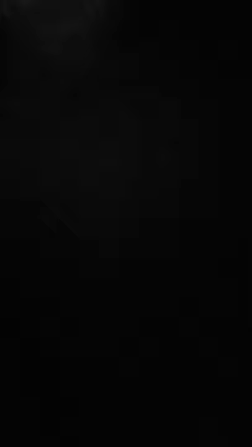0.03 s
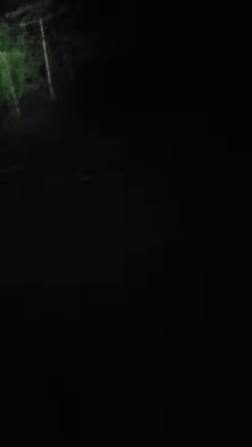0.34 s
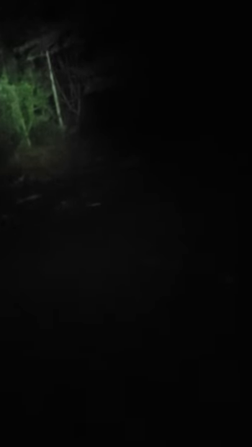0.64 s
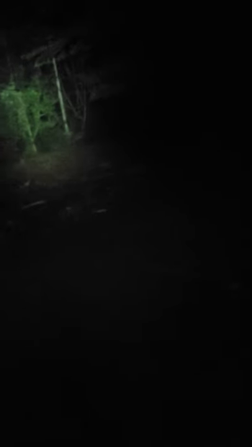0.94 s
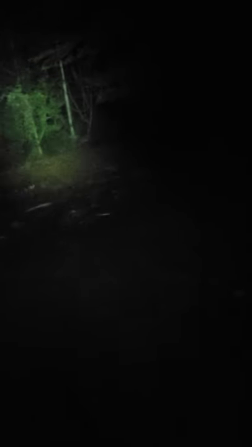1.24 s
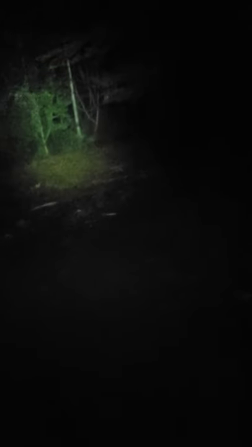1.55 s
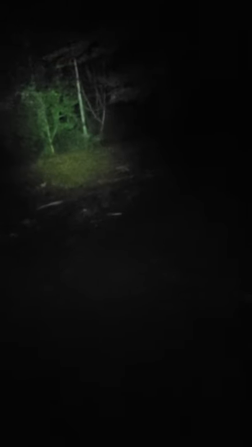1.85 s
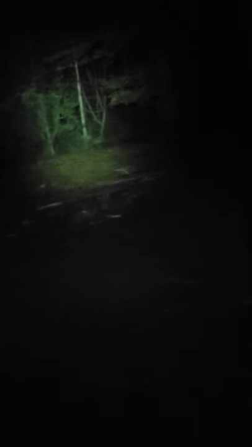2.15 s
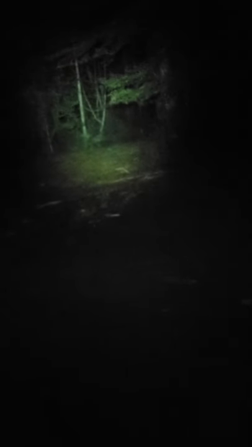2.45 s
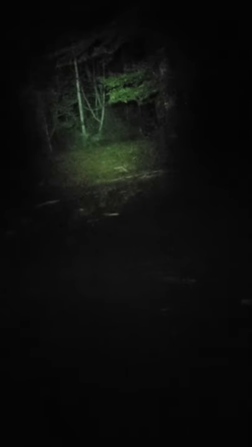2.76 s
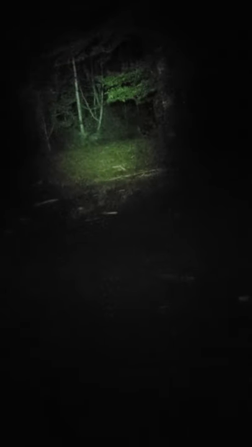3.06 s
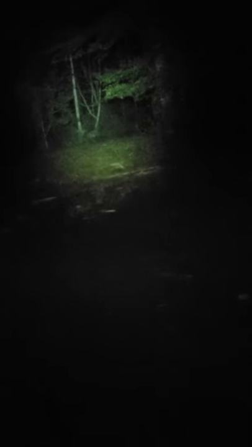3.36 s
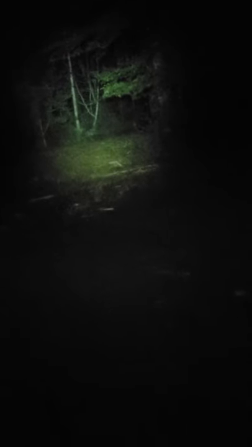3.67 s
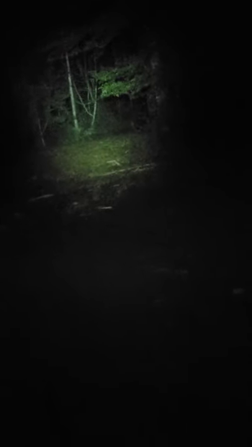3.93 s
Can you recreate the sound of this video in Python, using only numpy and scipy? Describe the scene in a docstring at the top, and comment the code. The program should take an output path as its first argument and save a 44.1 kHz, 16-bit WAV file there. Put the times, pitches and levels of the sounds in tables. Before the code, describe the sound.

Two hoarse, falling fox barks echo from a distance through night woods, about a second and a half apart. Katydids scrape steadily over faint frogs, a cricket joins near the end, and the hand-held microphone adds light bumps.

```python
"""A fox in the night woods

A distant fox pushes voice and breath through its throat in two harsh barks that ring among the trees.
Katydids scrape their wings all round, over hissing small insects and far frogs; late on, a tree
cricket chirps. Under it lies a faint drone; the hand-held microphone adds rumble, rustle and bumps."""
import sys
import numpy as np
from scipy import signal
from scipy.fft import rfft, irfft, next_fast_len
from scipy.io import wavfile
from scipy.ndimage import map_coordinates

SR = 44100
rng = np.random.default_rng(int(sys.argv[2]) if len(sys.argv) > 2 else 0)


def wav_out(sig):
    """Save sig, one row per channel (or a flat mono array), as 16-bit PCM at SR to the path in sys.argv[1]."""
    wavfile.write(sys.argv[1], SR, np.round(np.clip(np.atleast_2d(sig).T, -1, 1) * 32767).astype(np.int16))


N = 176400
TIME = np.arange(N) / SR

# How each bark moves, one list per bark (time [s], mouth resonance [Hz], effort [dB])
BARK_SHAPES = [
    [(.095, 1330, -17), (.148, 1230, -4), (.22, 1080, 0), (.31, 980, -3.5), (.365, 845, -7.5)],
    [(1.53, 1650, -15), (1.575, 1340, -3), (1.628, 1193, 0), (1.685, 980, 0.5), (1.745, 908.6, -2.5),
     (1.795, 822, -7)],
]
# How strongly the throat passes each frequency (frequency [Hz], relative level [dB])
THROAT_TONE = [(120, -32.5), (260, -15), (470, -25), (590, -24.5), (720, -11.5), (830, -2), (1000, -3.5),
               (1350, -6.5), (1680, 1.5), (1950, -11.5), (2500, -7.5), (3200, -14), (5000, -31),
               (9000, -50), (15000, -82)]
def fox():
    """Voice and pulsing breath ring the throat; pitch and mouth resonance sink as the jaw closes."""
    top_pitch_hz, jitter, release_s = 1147.5, 0.03002, .021
    mouth_width_hz, mouth_db, thin_db = 200, 6, 8
    barks = np.zeros(N)
    for shape in BARK_SHAPES:
        times, mouths, efforts = np.transpose(shape)
        pitch = np.minimum(np.interp(TIME, times, mouths), top_pitch_hz)
        phase = phase_of(pitch * (1 + jitter * wobble(260)))
        voice = unit(sum(np.sin(k * phase) / k for k in range(1, 5)) * amp(1.7 * wobble(180)))
        breath = rng.standard_normal(N) * (1 + 0.74 * np.cos(phase)) * amp(1.13 * wobble(120))
        voice, breath = (unit(resonate(part[None], THROAT_TONE)[0]) for part in (voice, breath))
        breath_share = np.interp(TIME, times[[1, -1]], [.97, .86])  # mostly breath, so it is harsh
        harsh = np.sqrt(1 - breath_share) * voice + np.sqrt(breath_share) * breath
        # Cut the sound into short slices to change its tone over time.
        hz, t, slices = signal.stft(harsh, SR, nperseg=512)
        hz = hz[:, None]
        mouth_hz, effort_db = np.interp(t, times, mouths), np.interp(t, times, efforts)
        mouth = amp(mouth_db / (1 + ((hz - mouth_hz) / mouth_width_hz) ** 2) - mouth_db / 2)
        # More effort gives more treble; the cry starts thin and fills out below.
        bright = amp(1.7 * effort_db * np.clip(np.log2((hz + 1) / 1600), 0, 1))
        thin = amp(-thin_db * np.clip((mouth_hz - np.maximum(hz, 800)) / 500, 0, 1))
        cry = signal.istft(slices * mouth * bright * thin, SR, nperseg=512)[1][:N]
        outside_s = np.maximum(times[0] - TIME, 0) + np.maximum(TIME - times[-1], 0)
        barks += cry * amp(np.interp(TIME, times, efforts) - 42.5) * np.exp(-outside_s / release_s)
    return pan(db=4.5) * among_trees(barks, trunks_db=0, woods_db=-6.5)


# Wing strokes of the nearby katydids (start [s], length [s], relative level [dB])
WING_STROKES = [(0.109, 0.028, -51.5), (0.158, 0.067, -39.0), (0.305, 0.015, -43), (0.346, 0.02, -35),
                (0.477, 0.035, -35), (0.521, 0.063, -37.5), (0.603, 0.053, -36), (0.683, 0.039, -37.5),
                (0.782, 0.064, -36.5), (0.86, 0.04, -40.5), (0.926, 0.035, -38.5), (0.965, 0.026, -33),
                (1.031, 0.058, -41.5), (1.091, 0.051, -35.5), (1.147, 0.048, -40), (1.2, 0.06, -38),
                (1.292, 0.041, -35.5), (1.357, 0.046, -42), (1.471, 0.1, -39.5), (1.621, 0.056, -41.5),
                (1.656, 0.026, -35.5), (1.754, 0.097, -36), (1.91, 0.042, -42.5), (2.005, 0.025, -37.5),
                (2.071, 0.022, -42), (2.163, 0.034, -36.5), (2.262, 0.022, -44), (2.319, 0.04, -35.5),
                (2.389, 0.024, -37.5), (2.43, 0.041, -36), (2.502, 0.026, -39), (2.564, 0.032, -39.5),
                (2.626, 0.072, -35.5), (2.719, 0.029, -45.5), (2.811, 0.053, -35), (2.878, 0.025, -38),
                (2.968, 0.06, -36), (3.132, 0.06, -36), (3.218, 0.096, -42.5), (3.288, 0.065, -37),
                (3.383, 0.0506, -40), (3.574, 0.034, -43.5), (3.758, 0.042, -38.5), (3.83, 0.048, -48.5),
                (3.933, 0.056, -39)]
# How a katydid's wing rings (frequency [Hz], relative level [dB])
WING_TONE = [(2000, -43.5), (2600, -27.5), (2880, -7), (3100, 0), (3300, -1.5), (3560, 4), (3850, -2.5),
             (4100, -10.5), (4450, -26.5), (7000, -34), (9000, -48), (13000, -55)]
def near_katydids():
    """Tiny teeth strike and ring the wings, making rasps; most of the insects sit to the left."""
    sides_db = 5 + 2 * rng.standard_normal(len(WING_STROKES))
    strikes = np.zeros((2, N))
    for (start, length, db), side_db in zip(WING_STROKES, sides_db):
        strikes += amp(db - 4.5) * pan(side_db) * wing_peak(wing_stroke(start, length))
    return among_trees(resonate(strikes, WING_TONE), trunks_db=-11, woods_db=-20)


def wing_stroke(start, length):
    """A quick, uneven run of tooth strikes, each reaching left and right by its own path."""
    tooth_hz, edge_s, path_spread_s, force_spread_db = 370, .003, .0002, .9
    draws = rng.standard_normal((6, 90))
    speed, gaps, paths, forces = draws[0, 0], draws[1], draws[2:4], draws[4:]
    rate = tooth_hz * np.exp(.15 * speed)
    t = np.cumsum(np.abs(1 + .14 * gaps)) / rate - edge_s
    swell = np.clip(np.minimum(t + edge_s, length + edge_s - t) / (2 * edge_s), 0, 1)
    strikes = np.zeros((2, N))
    for side in range(2):
        arrival_s = start + t + path_spread_s * paths[side]
        at = np.clip((arrival_s * SR).astype(int), 0, N - 1)
        strikes[side] = np.bincount(at, swell * amp(force_spread_db * forces[side]) * (at < N - 1), N)
    return strikes * np.sqrt(SR / rate)


def wing_peak(strikes):
    """Every insect's wing rings at a slightly different pitch."""
    hz = 3610 * np.exp(.03 * rng.standard_normal())
    return strikes + .7 * signal.lfilter(*signal.iirpeak(hz, Q=16, fs=SR), strikes + 1e-20)


# The tree cricket's chirps (loudest moment [s], pitch [Hz], relative level [dB])
CRICKET_CHIRPS = [(2.934, 2085, -44.5), (2.94, 2255, -49.5), (2.984, 2085, -51), (3.062, 2175, -45.5),
                  (3.171, 2212, -39.5), (3.289, 2206, -40.5), (3.404, 2203, -41), (3.521, 2210, -43),
                  (3.65, 2210, -43.5), (3.771, 2202, -42.5), (3.883, 2203, -44), (3.999, 2210, -41)]
def tree_cricket():
    """Nearly pure chirps swell and stop short; echoes fill the gaps."""
    fall_s, waver_hz = .011, 13
    song = np.zeros(N)
    for crest, hz, db in CRICKET_CHIRPS:
        t = TIME - crest
        rise_s = .015 if crest < CRICKET_CHIRPS[0][0] + .05 else .028  # the opening is more abrupt
        swell = np.exp(-(t / np.where(t < 0, rise_s, fall_s)) ** 2)
        song += amp(db - .8) * swell * np.sin(phase_of(hz + waver_hz * wobble(170)))
    return pan(db=-0.5) * among_trees(song, trunks_db=-9, woods_db=-2.5)


# How loud the far katydids and crickets are (time [s], level [dB])
CHORUS_LOUDNESS = [(.07, -45), (.45, -47.5), (1.1, -42), (2.6, -45.5), (3.35, -44.5), (3.5, -49.5),
                   (4, -53.5)]
def far_katydids():
    """Countless rasps merge into a fluttering hiss; at its centre, far crickets add a wavering trill."""
    trill_hz, waver_hz, flutter_db = 3630, 60, 2.8
    flutter = amp(flutter_db * wobble(35)) * (1 + 0.053 * np.tanh([wobble(380), wobble(300)]))
    phase = phase_of(trill_hz + waver_hz * np.array([wobble(140), wobble(140)]))
    trill = unit(np.sin(phase) * np.abs([wobble(60), wobble(60)]))
    rasps = unit(flutter * noise(WING_TONE, alike=0.042))
    return level(CHORUS_LOUDNESS) * pan(db=2.5) * (rasps + amp(-5) * trill)


# The tone of the insect hiss (frequency [Hz], relative level [dB])
HISS_TONE = [(3800, -22), (4500, -11), (5250, -4.5), (5620, 4), (5850, -0.5), (6280, -0.5), (6650, -10.5),
             (7500, -30.5), (9600, -38), (10500, -31), (11100, -24.5), (12000, -38), (15700, -33.5)]
# How far left the hiss leans (frequency [Hz], left minus right [dB])
HISS_LEAN = [(4200, 2.5), (5500, 11.5), (6300, 22.5), (7800, 40.5), (9500, 23), (11100, 9.5), (13000, 3)]
# How loud the hiss is (time [s], level [dB])
HISS_LOUDNESS = [(0, -55.5), (1.3, -53.5), (3.1, -53), (4, -55)]
def small_insects():
    """Small insects blend into a high, finely pulsing hiss, mostly from the left."""
    def lean_left(hz):
        gains = pan(value_at(HISS_LEAN, hz))
        return gains / np.linalg.norm(gains, axis=0)

    pulsing = 1 + .13 * np.sin(2 * np.pi * 57 * TIME) + .12 * np.sin(2 * np.pi * 78 * TIME)
    loudness = level(HISS_LOUDNESS) * amp(0.8 * wobble(24))
    return loudness * unit(filtered(noise(HISS_TONE, alike=0), lean_left) * pulsing)


# The tone of the frog chorus (frequency [Hz], relative level [dB])
FROG_TONE = [(500, -30), (800, -23), (1150, -13.5), (1420, 4), (1620, 3), (1900, -11.5), (2400, -17.5),
             (3200, -52.5)]
# How loud the frogs are (time [s], level [dB])
FROG_LOUDNESS = [(0, -63), (1.4, -70.5), (2.1, -65), (2.6, -62.5), (4, -65)]
def far_frogs():
    """Far frogs blur into a soft chorus that sinks and swells again."""
    return level(FROG_LOUDNESS) * amp(1.5 * wobble(18)) * pan(db=4) * noise(FROG_TONE, alike=0.033)


# How loud the hum is (time [s], level [dB])
HUM_LOUDNESS = [(.4, -91), (.95, -60.5), (2.3, -79)]
# The tone of the far-off rush (frequency [Hz], relative level [dB])
RUSH_TONE = [(90, -13.5), (150, 4), (230, -2), (330, -5.5), (450, -14.5), (700, -28.5), (1500, -44.5)]
# How loud the rush is (time [s], level [dB])
RUSH_LOUDNESS = [(.1, -63), (.7, -68.5), (2.3, -68), (2.7, -68), (4, -73)]
def distant_drone():
    """A low far-off rush dies down, with a faint hum in it."""
    hum_hz, waver_hz = 158, 10
    hum = level(HUM_LOUDNESS) * amp(3 * wobble(20)) * np.sin(phase_of(hum_hz + waver_hz * wobble(25)))
    rush = level(RUSH_LOUDNESS) * amp(2.9 * wobble(26)) * noise(RUSH_TONE, alike=0.87)
    return pan(db=-1.5) * (hum + rush)


# Soft bumps of the hand (start [s], pitch [Hz], level [dB])
HAND_BUMPS = [(.584, 230, -47), (0.6, 85, -32.5), (2.197, 218, -49), (2.379, 269, -51.5)]
# The tones of the rumble and the rustle (frequency [Hz], relative level [dB])
RUMBLE_TONE = [(22, -36), (35, -7), (55, -0.5), (85, 1), (125, -6.5), (200, -24), (400, -43), (800, -67)]
RUSTLE_TONE = [(100, 0), (300, 7), (600, -6.5), (3000, -17), (7500, -5.5), (9200, -1), (10800, -6),
               (12200, 2), (14000, -16), (15700, -30)]
# How loud each one is (time [s], level [dB])
RUMBLE_LOUDNESS = [(0, -59.5), (1.2, -60), (2.1, -56), (2.9, -56), (3.3, -59.5), (4, -56)]
RUSTLE_LOUDNESS = [(.07, -68), (.2, -67), (.33, -76.5), (.9, -100)]
def hand_on_microphone():
    """The held microphone rumbles, rustles as it is swung round and takes a few soft bumps."""
    attack_s, fade_s = .003, .075
    bumps = np.zeros(N)
    for start, hz, db in HAND_BUMPS:
        t = np.maximum(TIME - start, 0)
        onset = 1 - np.exp(-(t / attack_s) ** 2)
        bumps += amp(db - 60 * t / fade_s) * np.sin(2 * np.pi * hz * t) * onset
    rumble = level(RUMBLE_LOUDNESS) * amp(1.5 * wobble(15)) * noise(RUMBLE_TONE, alike=0.95)
    rustle = level(RUSTLE_LOUDNESS) * noise(RUSTLE_TONE, alike=0)
    return pan(db=-1.9) * (bumps + rumble + rustle)


# How long the woods ring (frequency [Hz], time to fade by 60 dB [s])
WOODS_FADE = [(300, 4.2), (900, 1.22), (1700, 1.83), (3500, 1.3), (9000, 0.39)]
def among_trees(x, trunks_db, woods_db):
    """The direct sound, quick echoes from the nearest trunks and the long ring of the woods."""
    trunk_fade = [(1000, .13)]  # 0.13 s at every frequency
    return x + amp(trunks_db) * echoes(x, trunk_fade) + amp(woods_db) * echoes(x, WOODS_FADE)


def echoes(x, fade_times):
    """A blur of stereo echoes in which each frequency takes its given time to fade."""
    hz, t, slices = signal.stft(rng.standard_normal((2, SR + SR // 2)), SR, nperseg=256)
    fade = amp(-60 * t / value_at(fade_times, hz)[:, None])
    tail = signal.istft(slices * fade, SR, nperseg=256)[1]
    return signal.fftconvolve(np.atleast_2d(x), tail / np.linalg.norm(tail[0]), axes=1)[:, :N]


def resonate(x, tone):
    """Let x ring a body, such as a throat or a wing, that has the given tone."""
    size = 4096
    cepstrum = irfft(np.log(amp(value_at(tone, np.fft.rfftfreq(size, 1 / SR)))))
    # Keeping only the first half makes the ring come after the strike, never before.
    cepstrum[1:size // 2] *= 2
    cepstrum[size // 2 + 1:] = 0
    ring = irfft(np.exp(rfft(cepstrum)))
    return signal.fftconvolve(x, ring[None] / np.linalg.norm(ring), axes=1)[:, :N]


def noise(tone, alike):
    """Stereo noise with the given tone; left and right are unrelated at alike=0, the same at 1."""
    angle = np.arccos(np.clip(alike, -1, 1)) / 2
    pair = filtered(rng.standard_normal((2, N)), lambda hz: amp(value_at(tone, hz)))
    mid, side = pair * [[np.cos(angle)], [np.sin(angle)]]
    return unit(np.array([mid + side, mid - side]))


def filtered(x, response):
    """Turn each frequency of x up or down by the gain response(hz)."""
    size = next_fast_len(N + SR // 2)
    return irfft(rfft(x, size) * response(np.fft.rfftfreq(size, 1 / SR)), size)[..., :N]


def value_at(table, hz):
    """Read between the rows of a (frequency [Hz], value) table, with octaves evenly spaced."""
    frequencies, values = np.transpose(table)
    return np.interp(np.log(hz + 1), np.log(frequencies + 1), values)


def level(table):
    """The gain at every sample, from a (time [s], level [dB]) table."""
    return amp(np.interp(TIME, *np.transpose(table)))


def phase_of(hz):
    """The running angle of a wave whose pitch changes."""
    return 2 * np.pi * np.cumsum(hz, axis=-1) / SR


def wobble(rate):
    """A smooth curve through `rate` random values a second."""
    return map_coordinates(rng.standard_normal(int(N * rate / SR) + 4), [TIME * rate])


def pan(db):
    """Left and right gains that make the left louder by db."""
    return amp(np.array([[.5], [-.5]]) * db)


def amp(db):
    """Turn decibels into a gain."""
    return 10 ** (np.asarray(db) / 20)


def unit(x):
    """Scale x to an average strength (rms) of 1."""
    return x / np.sqrt(np.mean(x ** 2) + 1e-20)


def scene():
    """All the sources together."""
    animals = fox() + near_katydids() + far_katydids() + small_insects() + far_frogs() + tree_cricket()
    return animals + distant_drone() + hand_on_microphone()


def record(dry):
    """The microphone opens just after the start and cuts off the highest treble."""
    start_s, top_hz = .069, 15800
    return filtered(dry * (TIME > start_s), lambda hz: hz < top_hz)


dry = scene()
out = record(dry)
wav_out(out)
```